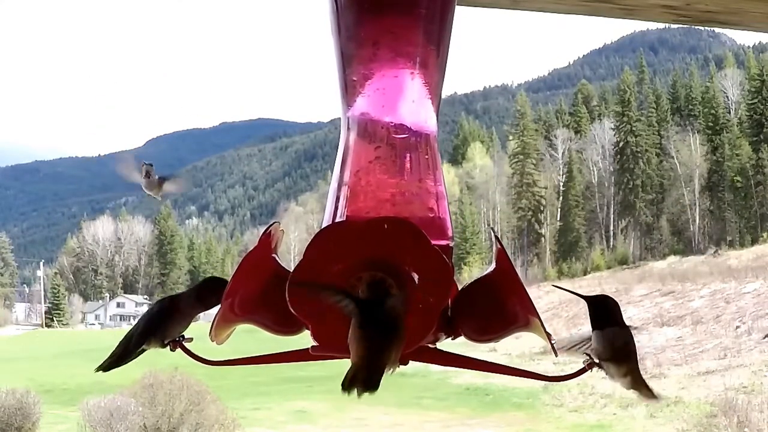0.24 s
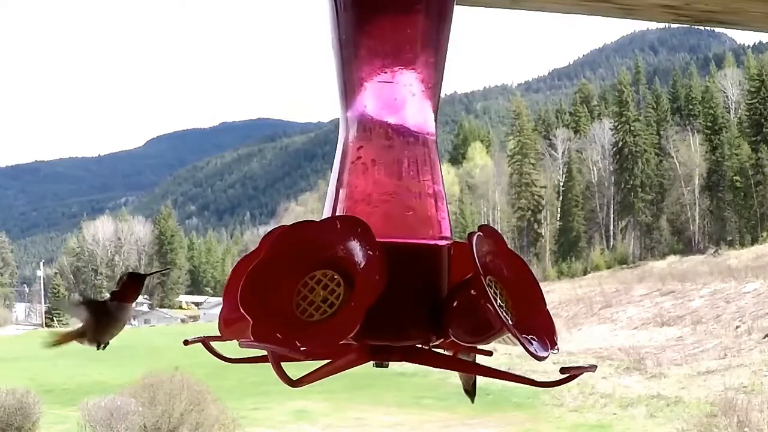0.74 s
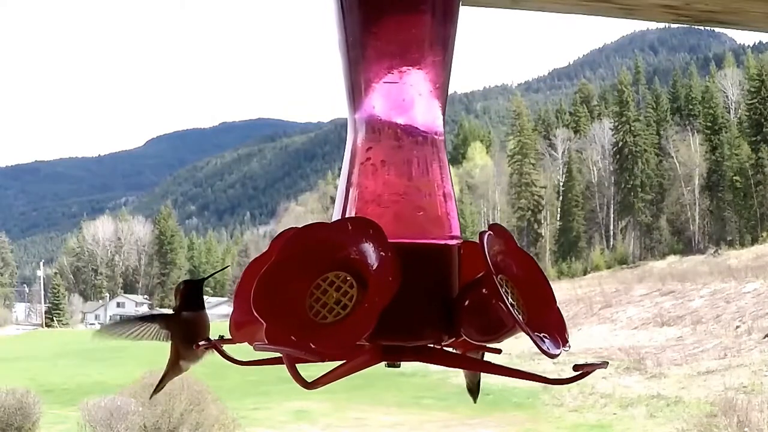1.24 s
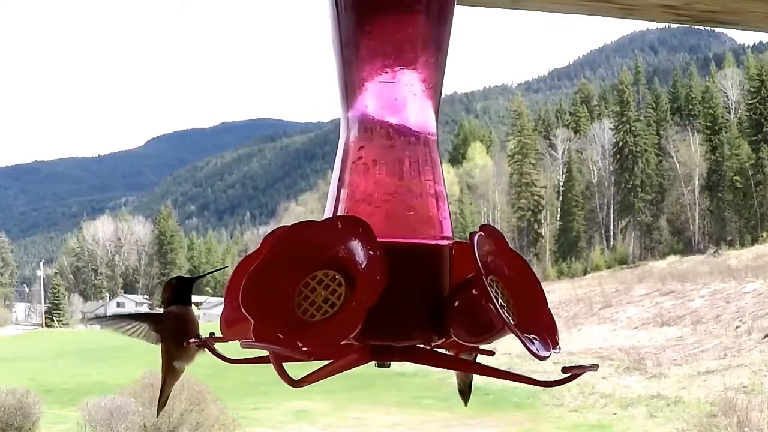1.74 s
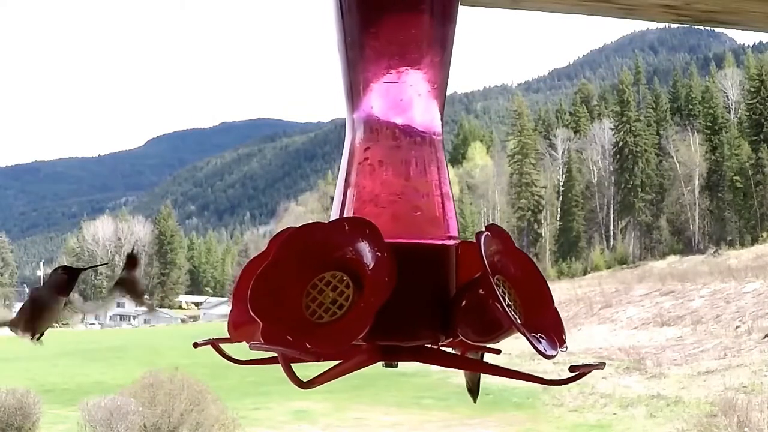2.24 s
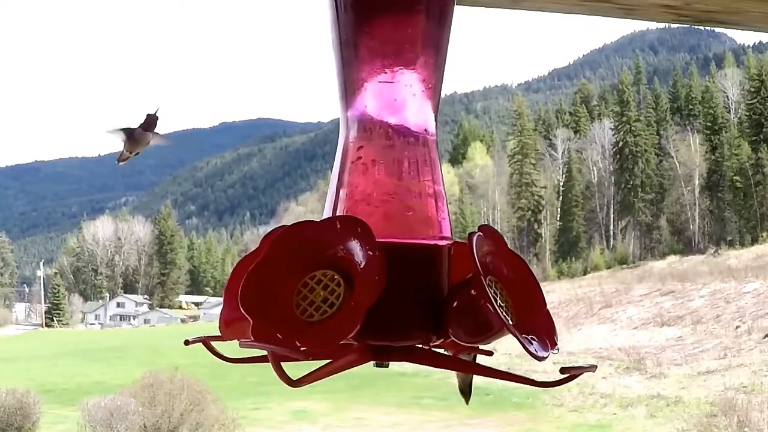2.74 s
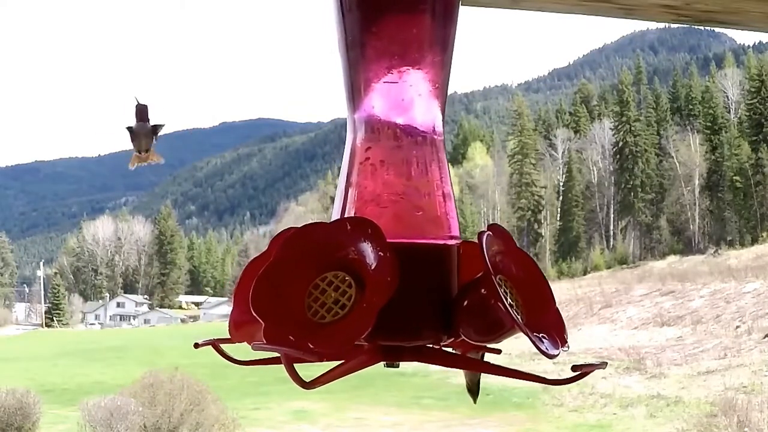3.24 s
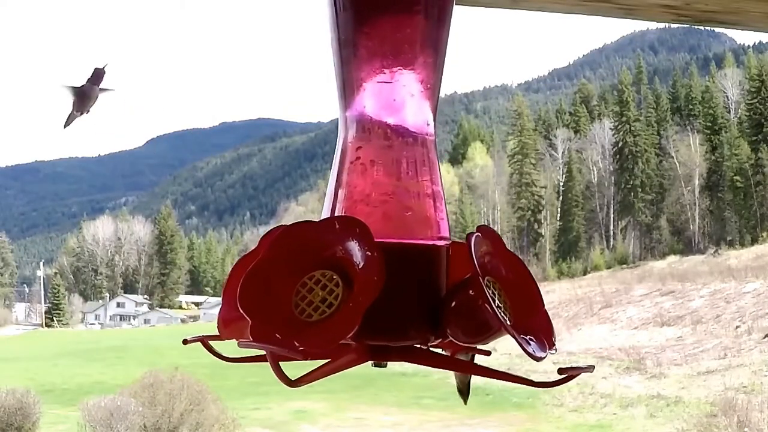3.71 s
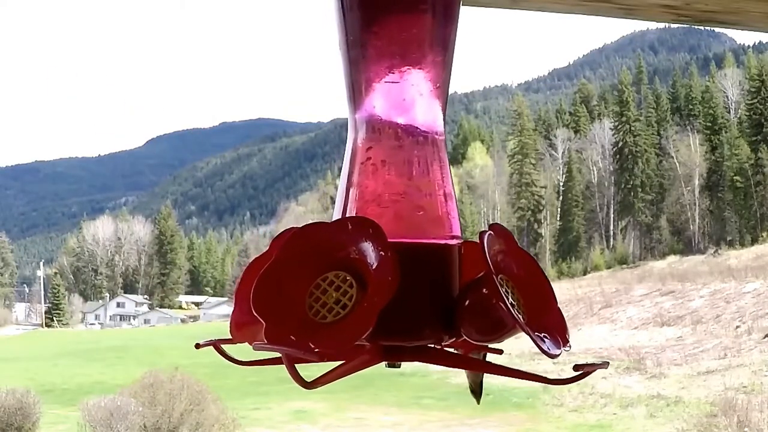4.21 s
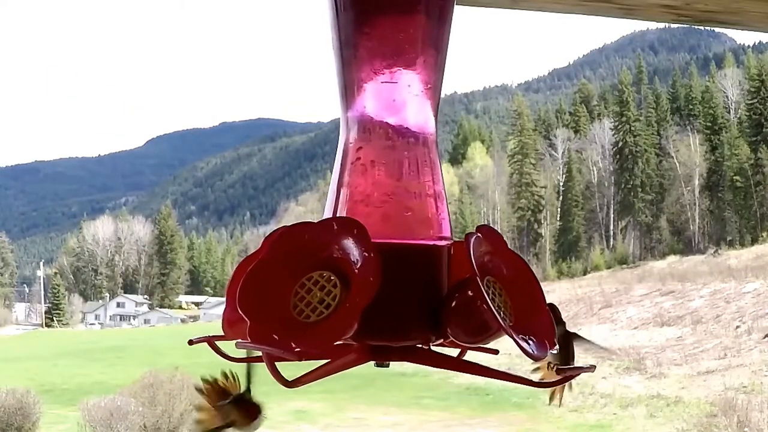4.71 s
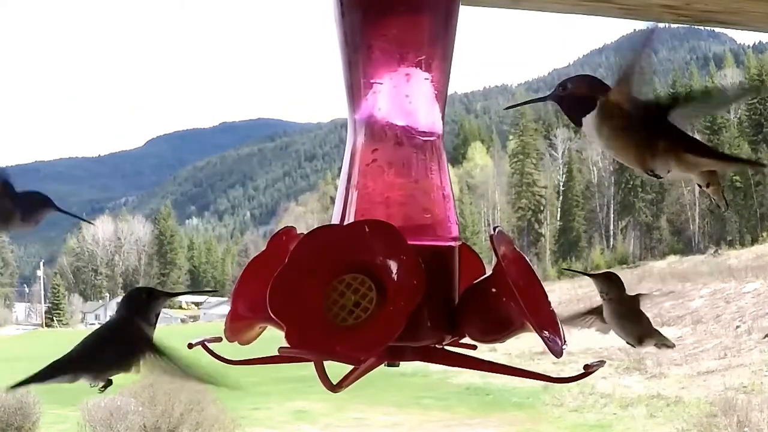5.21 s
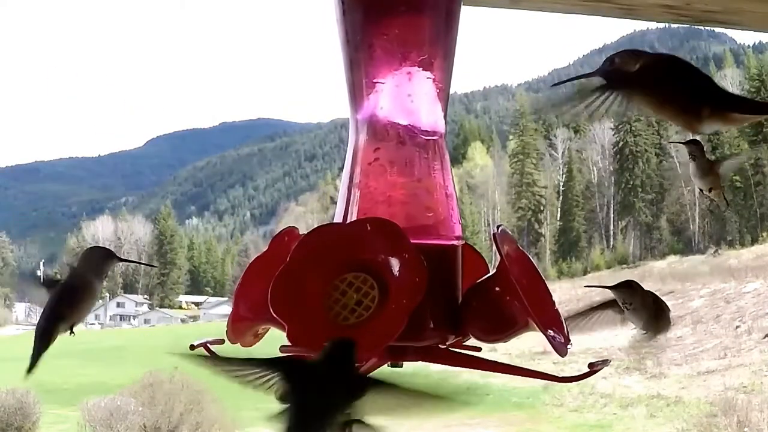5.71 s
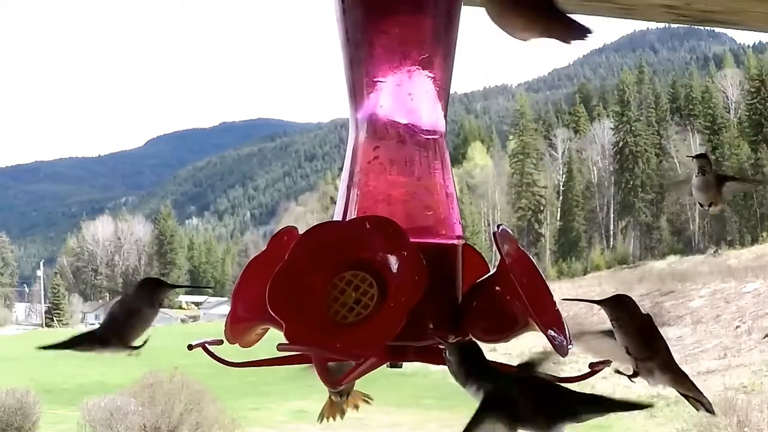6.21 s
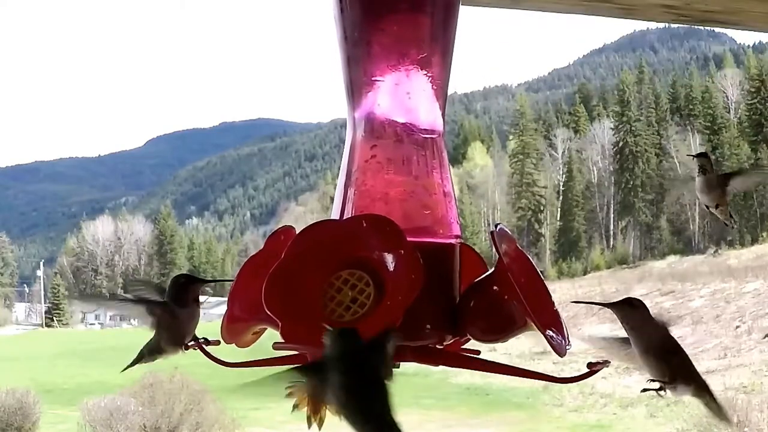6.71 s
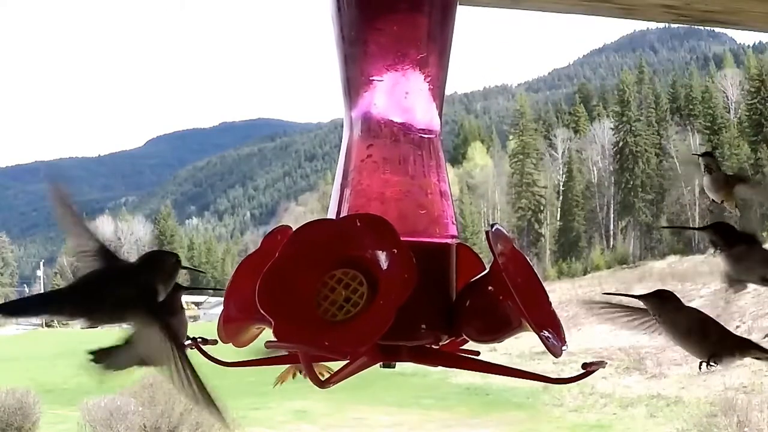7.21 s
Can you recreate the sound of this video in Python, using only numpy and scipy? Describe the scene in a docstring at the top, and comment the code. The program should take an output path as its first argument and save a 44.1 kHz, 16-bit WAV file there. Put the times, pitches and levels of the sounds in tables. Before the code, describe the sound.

From 0 to 0.45 seconds, slowed hummingbird wings make a dull low flutter around 15 beats a second over rumbling air, with a faint low trill and soft feeder bump. At 0.45 it cuts hard to bright natural speed under a porch: wing hums near 70 beats a second swell and fade, strongest around 3.4 and 4.2, with airy swishes and thin, very high pulsing trills. Sharp, plunging chips recur irregularly, the loudest near 3.3; a soft knock falls at 1.6. Thin whistles at 4.0 and 4.75 lead to a quick buzz and squeaky scolds until 5.2. Then another abrupt cut: muffled slow motion, heavy separate wingbeats and slow whistling pulses, a warbling rasp from 5.7 to 6.4, hoarse drooping calls at 6.4 and 6.9, dull knocks at 6.5 and 7.3, and a last short buzz before the abrupt end.

```python
"""Under a porch roof, hummingbirds squabble at a feeder: wings hum, males' wing tips trill, birds chip and scold.
Hums are stacked sine waves with a rush of noise; trills are one short whistle per wing beat;
calls are gliding tones shaped by the throat; soft knocks, background noise and porch echoes surround them.
There are three parts with hard cuts. The first and last run in slow motion, four and five times lower
and longer: the hum becomes a flutter, and the calls in the last part become dull whistles."""
import sys
import numpy as np
from scipy import signal
from scipy.fft import rfft, irfft, next_fast_len
from scipy.io import wavfile

SR = 44100
rng = np.random.default_rng(int(sys.argv[2]) if len(sys.argv) > 2 else 0)


def file_out(sig):
    """Save sig as 16-bit WAV at sys.argv[1]."""
    # one column per channel
    cols = np.atleast_2d(sig).T
    # limit, then scale
    lim = np.clip(cols, -1, 1)
    pcm = np.round(lim * 32767).astype(np.int16)
    wavfile.write(sys.argv[1], SR, pcm)


N = 328677
TIME = np.arange(N) / SR


def from_db(db):
    """Turn decibels into a multiplier."""
    return 10 ** (np.asarray(db) / 20)


def rms_one(x):
    """Scale a sound to an average power of one."""
    return x / np.sqrt(np.mean(x ** 2) + 1e-20)


def gain_at(spectrum, hz):
    """Read a tone-colour table at any pitch, as a multiplier."""
    points, db = np.transpose(spectrum)
    return from_db(np.interp(np.log(np.maximum(hz, 1)), np.log(points), db))


def noise(spectrum, slow=1):
    """Noise of average power one with the table's colour, lowered in pitch by the slow-down."""
    size = next_fast_len(N, real=True)
    hz = np.fft.rfftfreq(size, 1 / SR)
    coloured = rfft(rng.standard_normal(size)) * gain_at(spectrum, hz * slow)
    return rms_one(irfft(coloured, size)[:N])


def drift(t, rate):
    """Random wander around zero: straight lines between `rate` random values a second, of spread one."""
    knots = np.arange(t[0], t[-1] + 2 / rate, 1 / rate)
    return np.interp(t, knots, rng.standard_normal(len(knots)))


def low_pass(x, hz):
    """Remove nearly everything above a pitch, with a very steep edge."""
    return signal.sosfilt(signal.ellip(10, .2, 75, hz, fs=SR, output="sos"), x)


def span(start, end):
    """Sample times between two moments."""
    return np.arange(round(start * SR), round(end * SR)) / SR


def add(out, t, sound):
    """Mix a sound in at its own times, leaving off what falls outside the scene."""
    at = np.round(t * SR).astype(int)
    inside = (at >= 0) & (at < N)
    out[at[inside]] += sound[inside]


def porch(x, slow, echo_db, tail_db, echo_s=0.0038, scatter_t60=0.069, tail_t60=0.49):
    """An echo off the roof, a quick scatter from beams and wall, then a faint tail; times are unslowed."""
    t = span(0, .3 * slow) / slow
    fading = from_db(-60 * t / [[scatter_t60], [tail_t60]])
    early, late = rng.standard_normal((2, len(t))) * (t > echo_s) * fading
    response = from_db(echo_db) * early / np.linalg.norm(early)
    response += from_db(tail_db) * late / np.linalg.norm(late)
    response[round(echo_s * slow * SR)] += from_db(echo_db - 3.5)
    return x + signal.fftconvolve(x, response)[:N]


def pips(rows, slow, width=0.0014, droop=.035):
    """Once a stroke the narrow outer feathers flutter: a brief, falling whistle."""
    out = np.zeros(N)
    for s, db, hz in rows:
        t = span(s - 3 * width * slow, s + 3 * width * slow)
        age = (t - s) / (width * slow)
        phase = 2 * np.pi * np.cumsum(hz * (1 - droop * age)) / SR
        add(out, t, from_db(db) * np.exp(-age ** 2 / 2) * np.sin(phase))
    return out


# Wing-tip trills, swelling and fading at a steady wing beat. Columns: start t/s, crest t/s, end t/s,
# wing beat f/Hz, first f/Hz, last f/Hz, crest level/dB before scatter, extra send to the porch level/dB
WING_TIP_TRILLS = [(-0.049, 0.009, 0.2, 17.2, 2430.0, 2430.0, -52.5, 2.0),
                   (0.488, 0.531, 0.689, 74.0, 9050.0, 9200.0, -42.7, 3.0),
                   (0.89, 0.97, 1.1, 68.0, 7950.0, 8300.0, -53.8, 0.0),
                   (0.72, 1.48, 1.88, 66.0, 9330.0, 10260.0, -59.0, 4.0),
                   (2.094, 2.253, 2.412, 71.0, 10310.0, 9390.0, -48.0, 0.0),
                   (2.17, 2.335, 2.419, 66.0, 8710.0, 8950.0, -52.6, 6.0),
                   (2.482, 2.517, 2.72, 72.0, 9120.0, 9010.0, -41.6, 3.0),
                   (3.248, 3.335, 3.485, 66.0, 8530.0, 8780.0, -46.7, 6.0),
                   (3.363, 3.379, 3.644, 73.0, 9800.0, 8780.0, -35.9, 0.0),
                   (3.457, 3.621, 3.845, 67.0, 8900.0, 8820.0, -45.2, 5.0),
                   (3.788, 3.877, 4.233, 69.0, 9260.0, 9340.0, -44.6, 0.0),
                   (3.882, 3.994, 4.074, 66.0, 9210.0, 9020.0, -45.1, 6.0),
                   (4.132, 4.235, 4.472, 72.0, 10160.0, 9280.0, -37.7, 0.0),
                   (4.2, 4.342, 4.584, 66.0, 8700.0, 8530.0, -51.0, 6.0),
                   (4.362, 4.481, 4.623, 70.0, 9500.0, 8520.0, -40.5, 0.0),
                   (4.621, 4.651, 4.76, 71.0, 9190.0, 9780.0, -39.8, 0.0),
                   (4.722, 4.878, 4.954, 73.0, 9800.0, 9140.0, -43.0, 0.0),
                   (4.748, 5.117, 5.239, 66.0, 8780.0, 8820.0, -49.5, 5.0),
                   (5.151, 5.23, 5.58, 13.25, 1850.0, 1700.0, -43.0, 0.0),
                   (5.455, 5.53, 5.8, 13.4, 1790.0, 1740.0, -41.5, 0.0),
                   (5.605, 5.9, 6.6, 14.2, 1990.0, 1900.0, -43.0, 0.0),
                   (6.64, 7.04, 7.26, 15.2, 1930.0, 1880.0, -41.5, 0.0),
                   (6.713, 6.79, 6.98, 13.0, 1900.0, 1930.0, -45.0, 0.0)]
TRILL_EDGE_DB, TRILL_PITCH_PER_DB = -18.0, .002   # level at both ends; share of pitch gained per dB


def trills(start, end, slow, echo_db, tail_db, scatter_db=2.6, scatter=.019, scatter_growth=.45, usual_db=-44):
    """One pip per wing beat, rising in pitch with strength; louder birds vary more, further ones echo more."""
    direct, sent = np.zeros((2, N))
    for first, crest, last, beat_hz, first_hz, last_hz, db, porch_db in WING_TIP_TRILLS:
        if start <= crest < end:
            s = np.arange(first, last, 1 / beat_hz)
            chance = rng.standard_normal((len(s), 2))
            effort_db = TRILL_EDGE_DB * np.interp(s, [first, crest, last], [1, 0, 1]) ** 2
            spread = scatter * from_db(scatter_growth * (db - usual_db))
            hz = np.interp(s, [first, last], [first_hz, last_hz])
            hz = hz * (1 + TRILL_PITCH_PER_DB * effort_db + spread * chance[:, 1])
            level = db + effort_db + scatter_db * chance[:, 0]
            tips = pips(zip(s, level, hz), slow)
            direct += tips
            sent += from_db(porch_db) * tips
    reflections = porch(sent, slow, echo_db, tail_db) - sent
    return direct + reflections


# A bird darts up and backs off. Columns: nearest t/s, wing beat f/Hz, hum level/dB, swish level/dB,
# approach t/s, retreat t/s
WING_DARTS = [(0.052, 15.6, -39.3, -52.8, 0.044, 0.061), (0.234, 13.5, -46.5, -47.7, 0.057, 0.128),
              (0.449, 16.9, -41.9, -54.8, 0.049, 0.137), (0.592, 74.5, -44.0, -52.7, 0.111, 0.11),
              (0.792, 68.0, -54.0, -61.6, 0.024, 0.149), (0.993, 68.0, -52.9, -54.6, 0.054, 0.026),
              (1.08, 70.5, -45.5, -64.6, 0.057, 0.034), (1.183, 67.0, -53.8, -60.5, 0.041, 0.065),
              (1.713, 75.5, -55.5, -58.6, 0.12, 0.015), (2.114, 70.0, -43.0, -57.0, 0.048, 0.025),
              (2.229, 72.0, -44.0, -48.2, 0.079, 0.13), (2.596, 73.4, -44.1, -47.0, 0.087, 0.048),
              (2.697, 73.6, -40.5, -53.7, 0.016, 0.067), (2.848, 69.4, -41.4, -54.5, 0.042, 0.09),
              (3.002, 70.8, -48.7, -55.1, 0.057, 0.095), (3.322, 66.5, -44.5, -54.0, 0.223, 0.073),
              (3.392, 73.0, -32.4, -40.7, 0.017, 0.097), (3.614, 72.7, -45.3, -51.4, 0.026, 0.11),
              (4.015, 68.5, -48.6, -51.4, 0.331, 0.026), (4.222, 72.0, -32.5, -46.8, 0.039, 0.127),
              (4.507, 72.0, -48.6, -48.8, 0.378, 0.019), (4.637, 72.0, -39.9, -47.1, 0.017, 0.207),
              (4.84, 70.0, -46.5, -48.8, 0.059, 0.125), (5.146, 66.6, -42.7, -53.2, 0.217, 0.151),
              (5.49, 11.8, -39.2, -48.2, 0.165, 0.089), (5.634, 11.7, -34.4, -55.0, 0.063, 0.252),
              (5.946, 12.8, -34.2, -47.5, 0.04, 0.402), (6.556, 12.0, -40.1, -52.5, 0.032, 0.446),
              (7.009, 12.2, -37.8, -44.4, 0.333, 0.155), (7.452, 12.0, -39.2, -44.4, 0.189, 0.152)]
BEAT_SAG = .04   # share by which the wing beat slackens far from the nearest moment


def flight(start, end):
    """Beat rate, hum gain and swish gain: pressure falls with distance squared, the loudest hum leads the beat."""
    hum_power, swish_power, beat = np.zeros((3, N))
    for s, beat_hz, hum_db, swish_db, approach, retreat in WING_DARTS:
        if start <= s < end:
            near = 1 / (1 + ((TIME - s) / np.where(TIME < s, approach, retreat)) ** 2)
            power = (from_db(hum_db) * near) ** 2
            hum_power += power
            swish_power += (from_db(swish_db) * near) ** 2
            beat += power * beat_hz * (1 - BEAT_SAG * (1 - near))
    return beat / hum_power, np.sqrt(hum_power), np.sqrt(swish_power)


# Overtones of the wing beat. Columns: multiple of the beat, relative level/dB
HUM_OVERTONES = [(1, 0), (2, 1), (3, -10), (4, -8), (5, -17.5), (6, -20.5), (7, -29), (8, -20.5)]
# Colour of the air rushing off the wings at natural speed. Columns: f/Hz, relative level/dB (per Hz)
WING_SWISH = [(60, 0), (200, 5), (550, 0), (1000, -9), (1800, -17.5), (3500, -22), (6000, -22),
              (12000, -39.5)]


def wing_hum(start, end, slow, waver=0.42, throb=0.37):
    """Each stroke is a push and a pull of pressure, with a puff of turbulence at the reversal."""
    beat_hz, hum_gain, swish_gain = flight(start, end)
    phase = 2 * np.pi * np.cumsum(beat_hz) / SR
    hum = np.zeros(N)
    for k, db in HUM_OVERTONES:
        strength = from_db(db) * (1 + waver * drift(TIME, 20 / slow))
        hum -= strength * np.sin(k * phase + waver * drift(TIME, 25 / slow))
    swish = noise(WING_SWISH, slow) * np.exp(throb * np.cos(phase))
    return hum_gain * rms_one(hum) + swish_gain * rms_one(swish)


# Colour of the open air in the first part, as heard. Columns: f/Hz, relative level/dB (per Hz)
OPENING_AIR = [(12, -18), (20, 3.5), (44, -10.5), (170, -27), (387, -24.5), (578, -38.5), (825, -34),
               (964, -37.5), (1470, -39.5), (1880, -48.5), (2460, -45.5), (2690, -56), (3280, -50),
               (4100, -62), (5330, -90), (9020, -120)]


def opening_part(start, end, slow):
    """Slow motion: birds flutter at the feeder ports, in open air made of shaped noise."""
    tips = trills(start, end, slow, echo_db=-9.0, tail_db=-9.0)
    return tips + wing_hum(start, end, slow) + from_db(-40.5) * noise(OPENING_AIR)


# Soft bumps at the feeder. Columns: start t/s, f/Hz, starting level/dB of the note, time to fade by 60 dB t/s
FEEDER_BUMPS = [(.385, 400, -48, 0.16), (1.635, 375, -43, .1), (6.5, 330, -42, 0.0283),
                (7.265, 342, -34.5, .025)]


def bumps(grit=.6):
    """A bird knocks the plastic feeder: one damped, slightly gritty note."""
    out = np.zeros(N)
    for s, hz, db, t60 in FEEDER_BUMPS:
        t = span(s, s + t60)
        note = np.sin(2 * np.pi * hz * (t - s)) + grit * drift(t, 5 * hz)
        add(out, t, from_db(db - 60 * (t - s) / t60) * note)
    return out


# How throat and beak colour a call at natural speed. Columns: f/Hz, level/dB
THROAT_COLOUR = [(1400, -8.5), (1900, -15), (2700, -7), (3900, -12), (5200, -2), (6400, -3), (7800, -7.5),
                 (9500, -9.5), (12500, -17), (16000, -30)]


def syrinx(t, hz, slow, overtone_db, rough, rasp=0, count=5):
    """A tone with overtones through the throat; in harsh calls the membranes beat unevenly."""
    hz = hz * (1 + rough * drift(t, 1500 / slow))
    phase = 2 * np.pi * np.cumsum(hz) / SR
    tone = np.zeros(len(t))
    for k in range(1, count + 1):
        gain = from_db(overtone_db * (k - 1)) * gain_at(THROAT_COLOUR, k * hz * slow)
        playable = k * hz < SR / 2
        tone += gain * playable * np.sin(k * phase)
    judder = (1 + rasp * drift(t, 2200 / slow)) / np.sqrt(1 + rasp ** 2)
    soft_ends = np.clip(np.minimum(t - t[0], t[-1] - t) / (0.00036 * slow), 0, 1)
    return tone * judder * soft_ends


# Chips. Columns: pitch passes roughly 6 kHz t/s, level/dB before the throat, fall t/s
CHIP_CALLS = [(0.463, -28.5, 0.0067), (0.5631, -30, .0055), (.738, -51.5, 0.0074), (0.9139, -29.5, 0.0067),
              (1.102, -55, .007), (1.196, -56, 0.0079), (1.404, -52.5, 0.0051), (1.465, -53.5, 0.0065),
              (1.694, -52.5, 0.0076), (2.057, -41.5, 0.0045), (2.081, -29, 0.0065), (2.1927, -29, 0.0054),
              (2.5614, -27.5, 0.0062), (2.7177, -28, 0.0046), (2.9794, -27, 0.0049), (3.2388, -38, 0.0045),
              (3.3266, -23.5, 0.0046), (3.6417, -34.5, 0.0068), (3.9259, -30.5, .006), (4.034, -33, 0.0057),
              (4.4971, -34.5, 0.0079), (4.5715, -31.5, 0.0067), (4.7613, -28, 0.0046)]


def chips(top_hz=9300, end_hz=1450, fade_db=-9.5):
    """Each chip dives more than two octaves, flaring as it crosses the throat resonance."""
    out = np.zeros(N)
    for s, db, fall in CHIP_CALLS:
        t = span(s - 0.59 * fall, s + 2.68 * fall)
        hz = end_hz + (top_hz - end_hz) * np.exp(-(t - t[0]) / fall)
        fade = np.maximum(t - s, 0) / (t[-1] - s)
        voice = syrinx(t, hz, 0.97, overtone_db=-5.5, rough=0.02612, rasp=.2)
        add(out, t, from_db(db + fade_db * fade) * voice)
    return out


def swell(t, start, end, attack, release, sag_db, depth_db=-18.0):
    """Level in dB of one effort: attack, a slowly sagging hold, release."""
    edge = np.minimum(np.minimum((t - start) / attack, (end - t) / release), 1)
    return depth_db * (1 - edge) + sag_db * (t - start) / (end - start)


# Thin arched whistles. Columns: start t/s, length t/s, top f/Hz, level/dB before the throat
ARCHED_WHISTLES = [(4.001, .07, 6700, -33), (4.742, .048, 6600, -31)]


def whistles(start, end, slow, crest=.33, droop=.25, bend=2.3):
    """A whistle arches over its top pitch and droops as it ends."""
    out = np.zeros(N)
    for s, length, top_hz, db in ARCHED_WHISTLES:
        if start <= s < end:
            t = span(s, s + length)
            from_crest = np.abs(((t - s) / length - crest) / (1 - crest))
            hz = top_hz * (1 - droop * from_crest ** bend)
            level = db + swell(t, s, s + length, attack=.007, release=.009, sag_db=-3.0)
            add(out, t, from_db(level) * syrinx(t, hz, slow, overtone_db=-2.0, rough=0.023, rasp=0.19))
    return out


# Angry buzzes. Columns: start t/s, end t/s, warble period t/s, low f/Hz, high f/Hz,
# first level/dB and last level/dB, both before the throat
ANGRY_BUZZES = [(4.835, 4.883, 0.011, 2406, 4410, -33, -38),
                (5.683, 6.374, .0478, 1171, 1851, -32.5, -35.5),
                (7.383, 7.464, 0.035, 1170, 1450, -33.5, -30)]


def buzzes(start, end, slow, dip_db=-1.5):
    """A rasping pitch thrown up and down, about 90 to 140 times a second at natural speed, easing when high."""
    out = np.zeros(N)
    for first, last, period, low_hz, high_hz, first_db, last_db in ANGRY_BUZZES:
        if start <= first < end:
            t = span(first, last)
            turn = (t - first) / period + .03 * drift(t, 1 / period)
            swing = ((1 - np.sin(2 * np.pi * turn)) / 2) ** 2
            hz = low_hz * (high_hz / low_hz) ** swing * (1 + .02 * drift(t, 1 / period))
            voice = syrinx(t, hz, slow, overtone_db=-6.5, rough=.065, rasp=.8)
            level = np.linspace(first_db, last_db, len(t)) + dip_db * swing
            add(out, t, from_db(level) * voice)
    return out


# Scolding down-slurs. Columns: start t/s, length t/s, first f/Hz, low f/Hz before sagging,
# hold t/s, fall t/s, level/dB before the throat
SCOLDING_SLURS = [(4.927, .075, 5280, 2760, .001, .0062, -32.5), (5.05, .046, 4200, 2100, .001, .008, -32),
                  (5.16, .044, 8230, 2500, .002, .0105, -31), (6.385, .215, 1490, 570, .055, .05, -33),
                  (6.868, .325, 1130, 560, .004, .03, -32.5)]


def scolds(start, end, slow, sag=.22, wobble=.02):
    """A scold starts high, soon drops to a hoarse low note and keeps sagging as it fades."""
    out = np.zeros(N)
    for s, length, first_hz, low_hz, hold, fall, db in SCOLDING_SLURS:
        if start <= s < end:
            t = span(s, s + length)
            hz = low_hz + (first_hz - low_hz) * np.exp(-np.maximum(t - s - hold, 0) / fall)
            hz = hz * (1 - sag * (t - s) / length + wobble * drift(t, 200 / slow))
            level = db + swell(t, s, s + length, attack=.005 * slow, release=.007 * slow, sag_db=-9.0)
            voice = syrinx(t, hz, slow, overtone_db=-5.0, rough=.035, rasp=.5)
            add(out, t, from_db(level) * voice)
    return out


def voices(start, end, slow):
    """All whistles, buzzes and scolds of one part."""
    return whistles(start, end, slow) + buzzes(start, end, slow) + scolds(start, end, slow)


# Colour of the open air in the middle part. Columns: f/Hz, relative level/dB (per Hz)
NATURAL_SPEED_AIR = [(12, -41.5), (20, -6.5), (38, -4), (54, -5), (161, -17), (274, -23.5), (298, -27),
                     (404, -26.5), (439, -27.5), (932, -28.5), (1980, -39.5), (3170, -36.5), (8640, -48),
                     (9930, -45.5), (15500, -53.5)]
# A faint, steady, very high whine made of narrow noise. Columns: f/Hz, relative level/dB (per Hz)
HIGH_WHINE = [(11700, -40), (12150, 0), (12300, 0), (12800, -40)]


def natural_speed_part(start, end, slow):
    """Natural speed: hum, trills and calls under the porch, with air and a faint whine of shaped noise."""
    calls = porch(chips() + voices(start, end, slow), slow, echo_db=-8.5, tail_db=-10.0)
    tips = trills(start, end, slow, echo_db=-9.0, tail_db=-10.0)
    air = from_db(-52) * noise(NATURAL_SPEED_AIR) + from_db(-84) * noise(HIGH_WHINE)
    return calls + tips + wing_hum(start, end, slow) + air


# Colour of the last part's background: low air rumble with a blurred wash of slowed trills near 1.8 kHz.
# Columns: f/Hz, relative level/dB (per Hz)
CLOSING_BACKGROUND = [(12, -29), (20, 8), (59, -9), (129, -19.5), (205, -20.5), (505, -34), (623, -28.5),
                      (908, -39), (1140, -34.5), (1350, -41), (1780, -27), (2060, -38), (3000, -54),
                      (3900, -76), (6600, -120)]


def closing_part(start, end, slow):
    """Slow motion: a crowd arrives and quarrels, over shaped noise for low air rumble and a wash of trills."""
    calls = porch(voices(start, end, slow), slow, echo_db=-5.0, tail_db=-10.0)
    tips = trills(start, end, slow, echo_db=-4.5, tail_db=-16.5)
    background = from_db(-41.5) * noise(CLOSING_BACKGROUND)
    return calls + tips + wing_hum(start, end, slow) + background


# The three parts. Columns: start t/s, end t/s, slow-down factor, top of the band f/Hz
PARTS = [(0, .453, 4, 4150), (.453, 5.194, 1, 15600), (5.194, 7.46, 5, 3100)]


def scene():
    """The parts follow one another with hard cuts; the slowed parts have a lower top to their band."""
    out, knocks = np.zeros(N), bumps()
    players = (opening_part, natural_speed_part, closing_part)
    for play, (start, end, slow, top_hz) in zip(players, PARTS):
        sounding = np.clip(np.minimum(TIME - start, end - TIME) / .001, 0, 1)   # 1 ms edges avoid clicks
        out += low_pass(play(start, end, slow) + knocks, top_hz) * sounding
    return out[None]


def record(dry):
    """The very top of the whole sound is cut, above 15650 Hz."""
    return low_pass(dry, 15650)


dry = scene()
out = record(dry)
file_out(out)
```